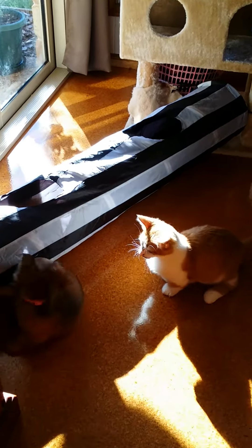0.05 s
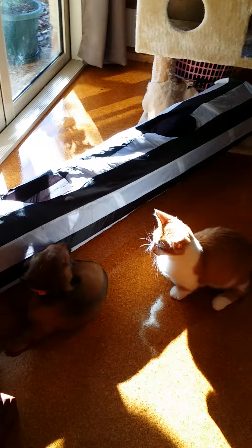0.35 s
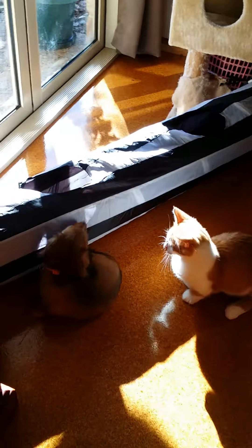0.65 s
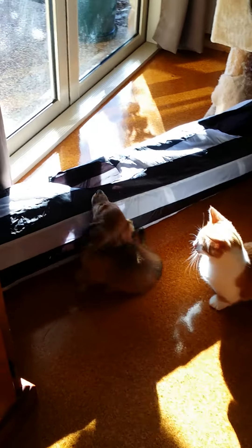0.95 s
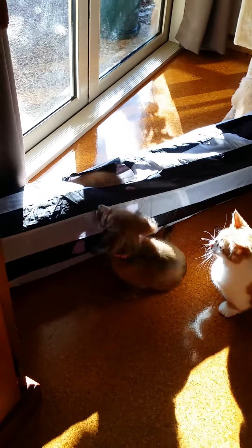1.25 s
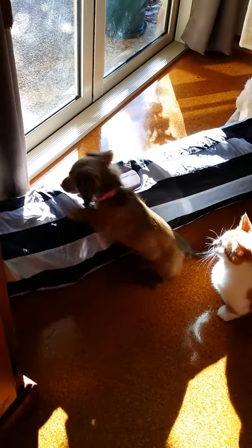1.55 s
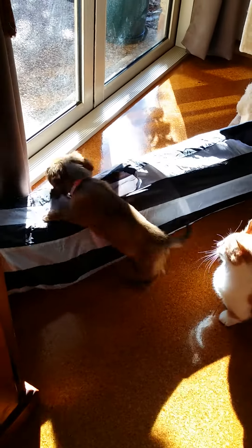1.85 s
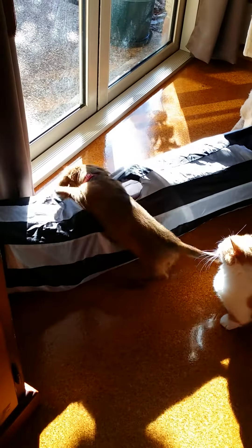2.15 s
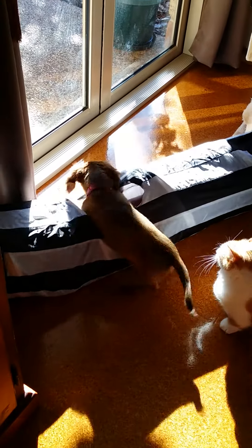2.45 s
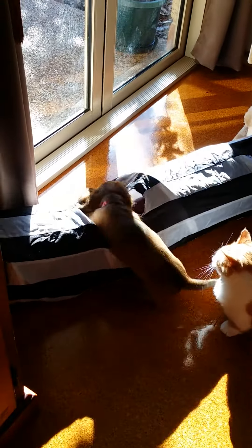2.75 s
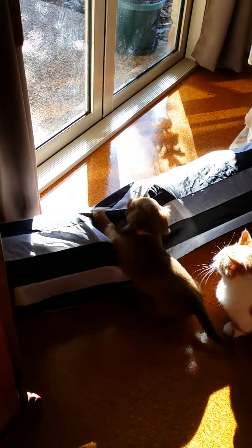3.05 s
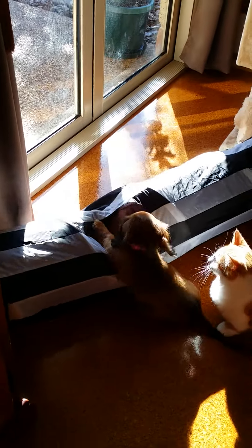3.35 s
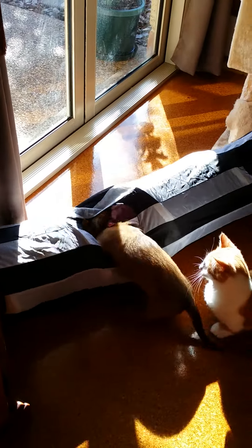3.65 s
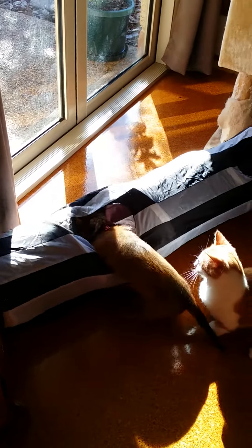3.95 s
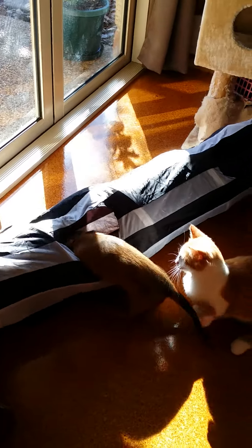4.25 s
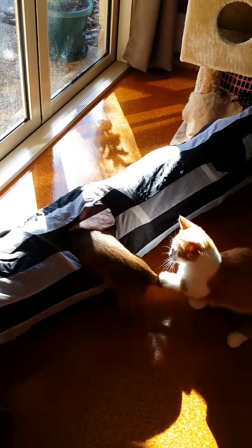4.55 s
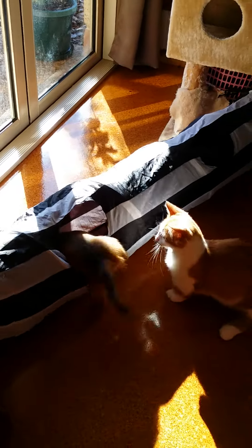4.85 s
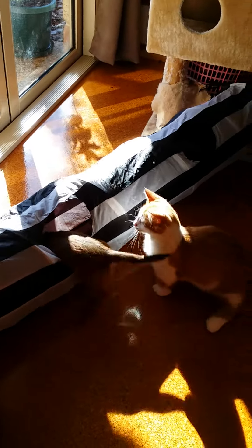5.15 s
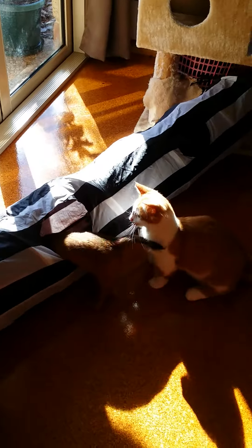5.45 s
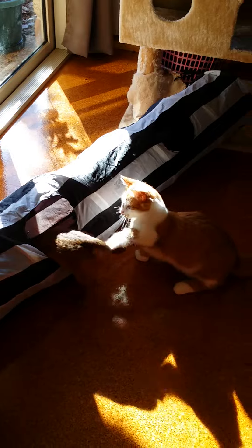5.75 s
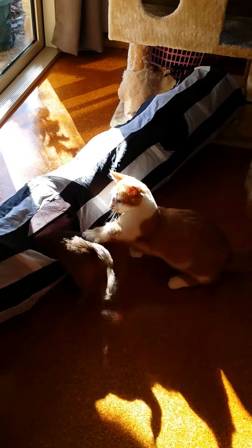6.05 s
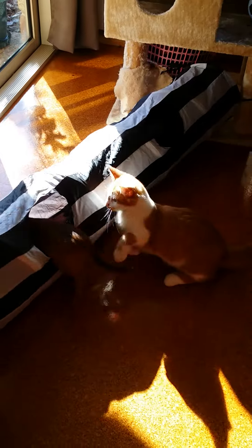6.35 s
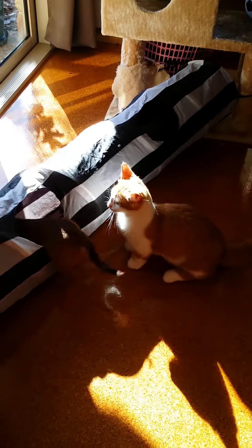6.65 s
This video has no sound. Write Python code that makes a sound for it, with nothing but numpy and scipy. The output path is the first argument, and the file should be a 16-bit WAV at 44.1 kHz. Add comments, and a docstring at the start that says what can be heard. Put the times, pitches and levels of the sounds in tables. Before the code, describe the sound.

Uneven bursts of fabric crinkling, swishing and snapping, with low flaps and light paw scuffs, as a puppy wriggles into a play tunnel.

```python
"""In a small room with a hard floor, a puppy noses a thin nylon play tunnel, climbs on it and burrows in.
The cloth crinkles as small folds buckle, rushes as it slides and booms as slack panels push the air.
Body rubs and flaps raise low swells in the tube; paws scuff by friction and thump as they land, and
stiff creases snap through. Sound and echoes reach two small microphone ports with resonant cavities."""
import sys
import numpy as np
from scipy import signal
from scipy.fft import rfft, irfft
from scipy.io import wavfile
from scipy.ndimage import uniform_filter1d

SR = 44100
rng = np.random.default_rng(int(sys.argv[2]) if len(sys.argv) > 2 else 0)


def unload_audio(sound):
    """Save the sound as a 16-bit wav file, at the path given as the first command line argument."""
    columns = np.transpose(np.atleast_2d(sound))
    # keep every value between -1 and 1, then stretch to whole-number steps
    steps = np.round(np.clip(columns, -1, 1) * 32767)
    wavfile.write(sys.argv[1], SR, steps.astype(np.int16))


N = 295911
TIME = np.arange(N) / SR
HZ = np.fft.rfftfreq(N, 1 / SR)

# How hard the puppy works the cloth: t/s, level/dB. It noses the tunnel, climbs on (from 1.2 s),
# treads it down (2.6 s), burrows in (3.6 s) and wriggles inside (5.9 s).
EFFORT = [(0, -68), (.2, -66), (.33, -71.5), (.78, -82.5), (.9, -68.5), (1.02, -69), (1.16, -53.5),
          (1.4, -40.5), (1.56, -50), (1.73, -42.5), (1.88, -51.5), (2.08, -51), (2.14, -56), (2.32, -58.5),
          (2.41, -63.5), (2.6, -63), (3.02, -47.5), (3.43, -71.5), (3.58, -58), (3.96, -52), (4.33, -45.5),
          (4.4, -40), (4.72, -38), (4.89, -46), (5.0, -39.5), (5.5, -53.5), (5.86, -39.5), (6.7, -46)]
# Low swells of the tunnel, from body rubs and slack panels flapping: peak t/s, level/dB, centre f/Hz
TUNNEL_SWELLS = [(.13, -60, 428), (.83, -69, 398), (.91, -66, 300), (1.38, -47.5, 226), (1.62, -51.5, 262),
                 (1.8, -48.5, 300), (2.69, -56.5, 395), (3.085, -51.5, 400), (3.682, -57, 457),
                 (4.03, -46.5, 413), (4.1, -50, 453), (4.392, -46.5, 328), (4.96, -53, 220),
                 (5.825, -47.5, 338), (6.2, -49.5, 227)]
# Paws scuffing the floor: t/s, pad level/dB, claw level/dB, claw f/Hz
PAW_SCUFFS = [(0.136, -70, -56.5, 2950), (.165, -60, -82, 2600), (0.202, -54, -65.5, 2210),
              (0.469, -69, -71.5, 1300), (.715, -85, -76.5, 1900), (.826, -77, -70, 1100),
              (.86, -60, -58, 2050), (0.912, -58.5, -62, 1860), (1.14, -62, -57, 1380),
              (1.323, -56, -47.5, 1240), (1.86, -55, -53, 1580), (2.633, -76, -61.5, 2390),
              (3.06, -62, -52, 1430), (3.84, -76, -56.5, 1370), (4.024, -67, -48.5, 1660),
              (4.077, -55, -49, 1840), (4.392, -55, -57, 1500), (5.84, -55, -48, 1810),
              (6.182, -52, -45.5, 1900)]
# Creases snapping through: t/s, level/dB
CREASE_SNAPS = [(0.143, -40), (.27, -57), (1.456, -28.5), (1.971, -37), (2.197, -42), (2.359, -47),
                (3.329, -43.5), (3.481, -47.5), (3.536, -41.5), (3.613, -40), (3.679, -54), (4.098, -32.5),
                (4.577, -24), (5.088, -28), (5.145, -27.5), (5.199, -44), (5.353, -32), (5.389, -30.5),
                (5.488, -35)]
# Quick strokes of cloth over cloth: peak t/s, level/dB, decay/s
CLOTH_SWISHES = [(.144, -57, 0.016), (0.349, -55.5, .018), (0.363, -53.5, 0.01), (1.224, -56, 0.0092),
                 (1.306, -42.5, 0.018), (1.97, -55, 0.061), (2.2, -53, 0.062), (2.3, -50, 0.022),
                 (2.635, -52, 0.032), (2.885, -52, 0.019), (3.329, -59.5, 0.036), (3.679, -47.5, 0.0082),
                 (4.024, -47, 0.13), (4.82, -37, 0.029), (5.143, -50, .008), (5.355, -48, 0.0065),
                 (5.416, -42, 0.012), (5.55, -44, 0.059), (5.658, -41.5, 0.026), (6.176, -31, 0.048),
                 (6.318, -35.5, 0.026), (6.438, -41, 0.063)]
# Paws landing on the tunnel and the floor under it: t/s, level/dB, f/Hz, decay/s
PAW_THUMPS = [(1.304, -35.5, 180, 0.014), (1.861, -38.5, 238, 0.0055), (2.757, -43, 298, .0045),
              (3.057, -30.5, 320, .004), (3.808, -40.5, 224, 0.0047), (4.077, -37, 418, .008)]

# Spectral densities of the sources: f/Hz, relative level/dB
BACKGROUND_SPECTRUM = [(15, 25.5), (40, 14), (70, 17.5), (110, 19.5), (200, -29), (500, 13), (1200, 4),
                       (3000, -16), (7500, 5.5), (10000, -15), (14500, -54)]
CRINKLE_SPECTRUM = [(100, -24), (500, -21), (1200, -5.5), (2300, -2.5), (4000, -1), (5500, -1),
                    (8000, -1.5), (11000, 1), (14500, -2)]
SLIDE_SPECTRUM = [(60, -41), (250, -6), (550, -2.5), (800, 1), (1100, -0.5), (1500, -0.5), (2200, -2),
                  (3000, -5.5), (5000, -3.5), (12000, -49)]
FLAP_SPECTRUM = [(15, -61), (45, -7.5), (70, -8), (110, -4), (160, -1.5), (230, 2.5), (290, -3.5),
                 (380, -2), (530, -0.5), (750, -11), (2000, -23), (8000, -71)]
SNAP_SPECTRUM = [(200, -31), (1000, -29), (2400, -8), (5000, -16), (8000, -7), (11000, -4.5), (14500, -10)]
PUFF_SPECTRUM = [(20, -50), (100, -11), (250, 2), (600, 0.5), (1500, -27), (6000, -67)]

# Reverberation time of the room: f/Hz, T60/s
ROOM_T60 = [(100, 0.69), (500, 0.24), (2000, 0.21), (6000, 0.35), (14000, 0.14)]
# Coherence between the two ports: f/Hz, correlation/1
PORT_COHERENCE = [(60, 0.31), (130, 0.84), (290, 0.87), (640, 0.48), (1410, 0.0045), (3100, 0.086),
                  (7000, 0)]
# Balance with the tunnel off to the right: f/Hz, left minus right level/dB
PORT_BALANCE = [(60, -3.5), (200, -3.5), (400, -5.5), (1100, -3), (2200, -4), (4200, -2.5), (6000, -3),
                (8000, -9.5), (10000, -6.5), (14500, -6.5)]
# Cavity resonance of the left and the right port: f/Hz, width/Hz, boost/dB
PORT_CAVITIES = [(7260, 2200, 10), (8100, 1400, 5.5)]


def amp(db):
    """Decibels to amplitude ratio."""
    return 10 ** (np.asarray(db) / 20)


def unit_rms(x):
    """Normalisation: a signal, or the mean of a pair, is scaled to rms 1."""
    return x / np.sqrt(np.mean(np.atleast_2d(x).mean(0) ** 2) + 1e-20)


def curve(points, hz):
    """Linear interpolation of a table on a log-frequency axis."""
    f, value = np.transpose(points)
    return np.interp(np.log(hz + 1), np.log(f), value)


def colour(x, spectrum, size=4096):
    """Minimum-phase filtering, of unit energy, with the given spectral shape."""
    log_gain = np.log(amp(curve(spectrum, abs(np.fft.fftfreq(size, 1 / SR)))))
    response = np.exp(np.conj(signal.hilbert(log_gain)))
    taps = np.fft.ifft(response).real[:size // 2]
    return signal.oaconvolve(x, taps[None] / np.linalg.norm(taps), axes=1)[:, :N]


def resonate(x, hz, width_hz):
    """Resonance: two equal resonators in series pass one steep-sided band, scaled to rms 1."""
    resonator = signal.iirpeak(hz, hz / width_hz, fs=SR)
    return unit_rms(signal.lfilter(*resonator, signal.lfilter(*resonator, x)))


def wander(rate_hz):
    """Slow random fluctuation: noise low-passed at rate_hz, rms 1."""
    return unit_rms(irfft(rfft(rng.standard_normal(N)) / (1 + (HZ / rate_hz) ** 4), N))


def at_ports(x):
    """Partial coherence: two independent signals become alike in the bass, as at two close ports."""
    left, other = rfft(x)
    coherence = np.clip(curve(PORT_COHERENCE, np.fft.rfftfreq(x.shape[1], 1 / SR)), -1, 1)
    right = coherence * left + np.sqrt(1 - coherence ** 2) * other
    return irfft(np.array([left, right]), x.shape[1])


def noise():
    """White noise at both ports."""
    return at_ports(rng.standard_normal((2, N)))


def grains(per_s, spread_db):
    """Shot noise: tiny impulses of random size at random moments, rms 1."""
    size = amp(spread_db * np.minimum(rng.exponential(1, N), 4))
    occurs = rng.random(N) < per_s / SR
    return unit_rms(at_ports(size * occurs * rng.standard_normal((2, N))))


def stroke(peak_s, rise_s, decay_s):
    """Transient envelope: a Gaussian rise to 1, then exponential decay."""
    envelope = np.zeros(N)
    span = slice(max(int((peak_s - 5 * rise_s) * SR), 0), int((peak_s + 10 * decay_s) * SR))
    t = TIME[span] - peak_s
    envelope[span] = np.exp(-(np.minimum(t, 0) / rise_s) ** 2 / 2 - np.maximum(t, 0) / decay_s)
    return envelope


def effort_gain(full_db, exponent, full_effort_db=-40):
    """Power law: a cloth motion's amplitude follows the effort and is full_db at full effort."""
    effort_db = np.interp(TIME, *np.transpose(EFFORT))
    return amp(full_db + exponent * (effort_db - full_effort_db))


def swish_gain(rise_share=0.13):
    """Incoherent addition: the envelopes of quick strokes sum in power; longer ones swell more slowly."""
    power = sum((amp(db) * stroke(s, rise_share * decay, decay)) ** 2 for s, db, decay in CLOTH_SWISHES)
    return np.sqrt(power)


def cascades(per_s=330, decay_s=0.0096):
    """Avalanches: one fold sets off its neighbours, so activity jumps and relaxes. Mean 0, rms 1."""
    starts = rng.uniform(0.22, 1, N) * (rng.random(N) < per_s / SR)
    activity = signal.lfilter([1], [1, -np.exp(-1 / (decay_s * SR))], starts)
    return unit_rms(activity - activity.mean())


def patchy(x, patch_db=1.38, bins=5, frames=14):
    """Spectral modulation: each fold has its own size and pitch, so the colour drifts in patches."""
    spectrogram = signal.stft(x, SR, nperseg=256)[2]
    field = rng.standard_normal(spectrogram.shape[1:])
    for width, axis in (bins, 0), (frames, 1), (bins, 0):
        field = uniform_filter1d(field, width, axis=axis)
    return signal.istft(spectrogram * amp(patch_db * field / field.std()), SR)[1][:, :N]


def background(level_db=-76):
    """Stationary noise: a faint, steady rumble and hiss."""
    return amp(level_db) * unit_rms(colour(noise(), BACKGROUND_SPECTRUM))


def crinkling(grip, buckle_db=-5, crackle_db=-13, cascade_db=1.5, grip_db=1.0):
    """Buckling: small folds give way in clumps, over the friction hiss of the weave."""
    level = np.hypot(effort_gain(full_db=-40, exponent=1), swish_gain())
    buckles = amp(buckle_db) * grains(per_s=5000, spread_db=3.0)
    crackles = amp(crackle_db) * grains(per_s=450, spread_db=-1.0)
    clumps = amp(cascade_db * cascades() + grip_db * grip)
    excitation = (noise() + buckles + crackles) * clumps
    return level * unit_rms(patchy(colour(excitation, CRINKLE_SPECTRUM)))


def sliding(grip, grip_db=1.3, swish_db=-11):
    """Stick-slip friction: cloth drags over fur and floor in a rush of small slips."""
    slips = grains(per_s=5000, spread_db=0.5) * amp(grip_db * grip)
    level = np.hypot(effort_gain(full_db=-50, exponent=0.77), amp(swish_db) * swish_gain())
    return level * unit_rms(colour(slips, SLIDE_SPECTRUM))


def flapping(grip, grip_db=1.27, swish_db=-17, on_top_s=2.23, spread_s=0.44, on_top_db=3):
    """Volume displacement: slack panels flip over and push the air in the tube, which booms low."""
    flips = grains(per_s=2000, spread_db=0.5) * amp(grip_db * grip)
    # the puppy's weight on top of the tube makes it flap more
    weight = amp(on_top_db * np.exp(-((TIME - on_top_s) / spread_s) ** 2 / 2))
    level = np.hypot(weight * effort_gain(full_db=-53, exponent=0.67), amp(swish_db) * swish_gain())
    return level * unit_rms(colour(flips, FLAP_SPECTRUM))


def tunnel_swells(rise_s=0.014, decay_s=0.055, width_hz=325):
    """Forced resonance: body rubs and flapping slack panels drive low swells in the tube."""
    excitation = grains(per_s=6000, spread_db=0.0)
    return sum(amp(db) * stroke(s, rise_s, decay_s) * resonate(excitation, hz, width_hz)
               for s, db, hz in TUNNEL_SWELLS)


def paw_scuffs(rise_s=0.0054, decay_s=0.037, scrape_db=-4.5):
    """Sliding friction: a paw slips on the floor, exciting a dull pad and a bright claw resonance."""
    friction = grains(per_s=6000, spread_db=6.5)
    pad = resonate(friction, hz=860, width_hz=300)
    scrape = amp(scrape_db) * unit_rms(colour(noise(), SLIDE_SPECTRUM))
    out = np.zeros((2, N))
    for s, pad_db, claw_db, claw_hz in PAW_SCUFFS:
        claws = resonate(friction, claw_hz, width_hz=1280) + scrape
        out += stroke(s, rise_s, decay_s) * (amp(pad_db) * pad + amp(claw_db) * claws)
    return out


def crease_snaps(gain_db=1):
    """Snap-through instability: a stiff crease gives way within a millisecond or two."""
    bursts = sum(amp(db) * stroke(s, rise_s=0.0002, decay_s=0.0015) for s, db in CREASE_SNAPS)
    return amp(gain_db) * colour(noise() * bursts, SNAP_SPECTRUM)


def paw_thumps(ring_db=-1, puff_db=-11):
    """Impact: each paw excites a damped low oscillation and a puff from the squeezed cloth."""
    ring, puff = np.zeros((2, N))
    for s, db, hz, decay in PAW_THUMPS:
        oscillation = np.sin(2 * np.pi * hz * (TIME - s))
        ring += amp(db) * stroke(s, rise_s=0.00008, decay_s=decay) * oscillation
        puff += amp(db) * stroke(s, rise_s=0.00038, decay_s=0.011)
    return amp(ring_db) * ring + amp(puff_db) * colour(noise() * puff, PUFF_SPECTRUM)


def echoes(tail_db, early_db, size=16384, count=8):
    """Impulse response of one spot: early reflections from floor and window, then a reverberant tail."""
    scatter = rng.standard_normal((2, size)) * (rng.random((2, size)) < .1)
    hz, t, spectrogram = signal.stft(scatter, SR, nperseg=256)
    decay = amp(-60 * t / curve(ROOM_T60, hz)[:, None]) * (t > .004)
    tail = signal.istft(spectrogram * decay, SR)[1]
    tail /= np.linalg.norm(tail, axis=1, keepdims=True)
    early = np.zeros_like(tail)
    delays = (rng.uniform(.001, .012, (2, count)) * SR).astype(int)
    np.put_along_axis(early, delays, rng.choice([-1, 1], (2, count)) / np.sqrt(count), 1)
    return amp(tail_db) * tail + amp(early_db) * early


def room(direct, tail_db=-8, early_db=-11, cycle_hz=9, spots=6):
    """Position-dependent reflection: the sound cycles through tunnel spots, each with its own echoes."""
    place = cycle_hz * TIME + .2 * wander(rate_hz=9.8)
    out = direct
    for spot in range(spots):
        distance = abs((place * spots - spot + spots / 2) % spots - spots / 2)
        share = np.cos(np.pi / 2 * np.minimum(distance, 1))  # equal-power crossfade
        response = at_ports(echoes(tail_db, early_db))
        out = out + signal.oaconvolve(direct * share, response, axes=1)[:, :N]
    return out / np.sqrt(1 + amp(tail_db) ** 2 + amp(early_db) ** 2)


def scene():
    """Superposition: tunnel and paws sound in the room, off to the right, over the background."""
    grip = wander(rate_hz=14.4)  # the cloth catches and lets go, in all three of its sounds at once
    cloth = crinkling(grip) + sliding(grip) + flapping(grip)
    play = room(cloth + crease_snaps() + paw_thumps() + paw_scuffs() + tunnel_swells())
    left_db = curve(PORT_BALANCE, HZ) / 2
    return irfft(rfft(play) * amp([left_db, -left_db]), N) + background()


def record(dry, gain_db=-1, cutoff_hz=14650):
    """Cavity resonance: each port lifts its own treble band; a low-pass then limits the bandwidth."""
    cavity_db = np.array([db / (1 + (2 * (HZ - hz) / width) ** 2) for hz, width, db in PORT_CAVITIES])
    heard = irfft(rfft(dry) * amp(cavity_db + gain_db), N)
    low_pass = signal.firwin(401, cutoff_hz, window=("kaiser", 8), fs=SR)
    return signal.oaconvolve(heard, low_pass[None], "same", axes=1)


dry = scene()
out = record(dry)
unload_audio(out)
```